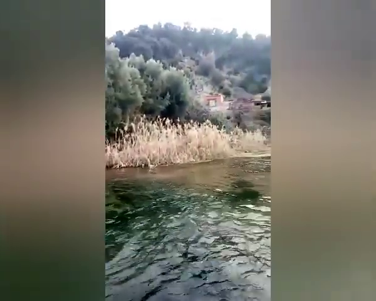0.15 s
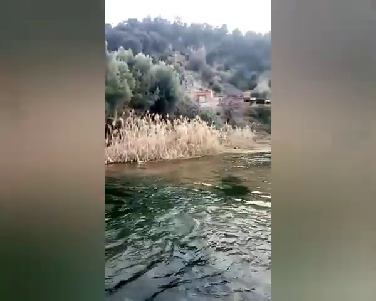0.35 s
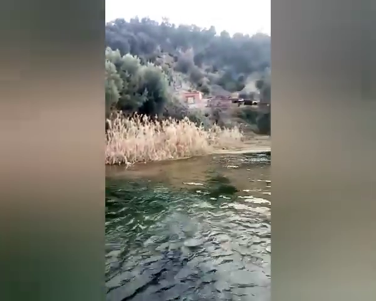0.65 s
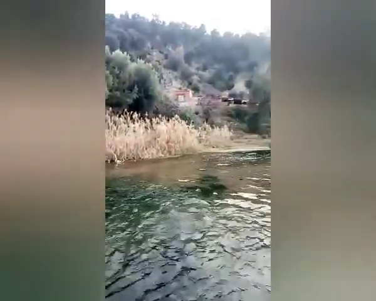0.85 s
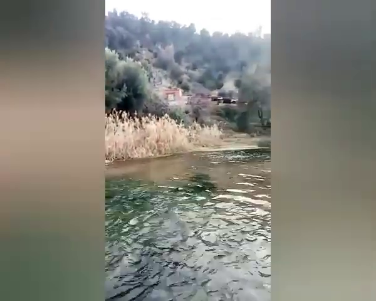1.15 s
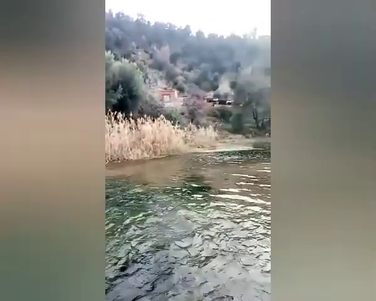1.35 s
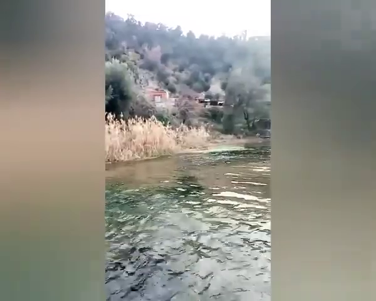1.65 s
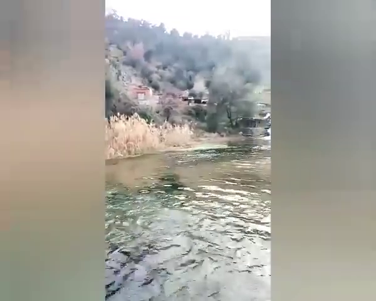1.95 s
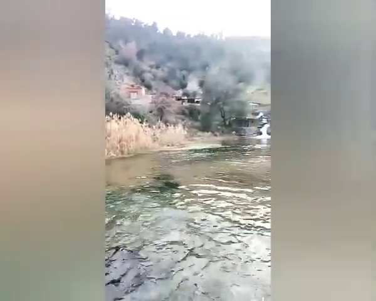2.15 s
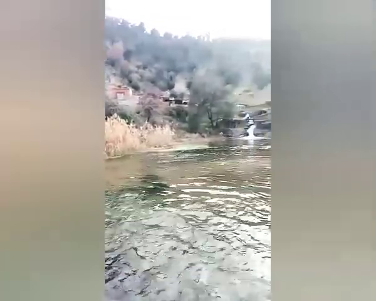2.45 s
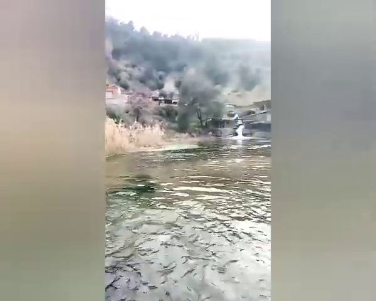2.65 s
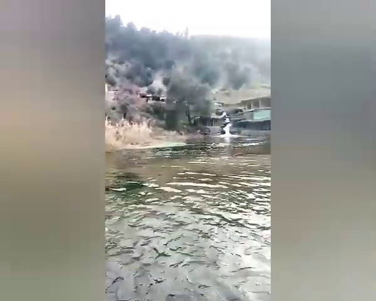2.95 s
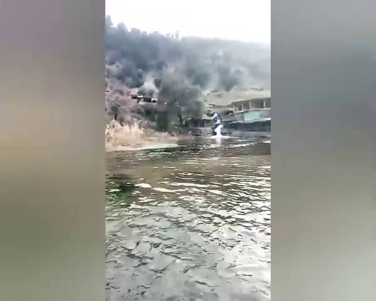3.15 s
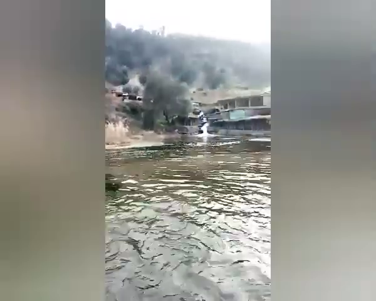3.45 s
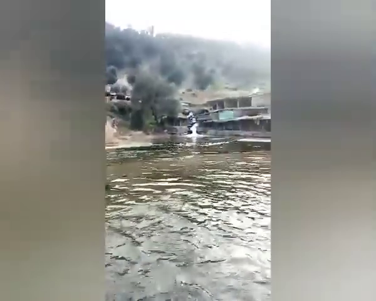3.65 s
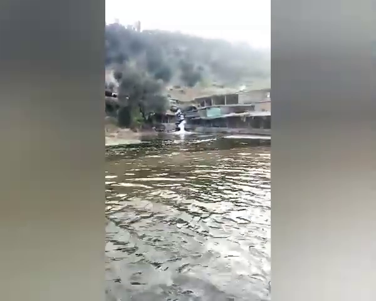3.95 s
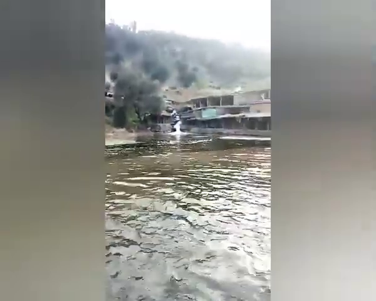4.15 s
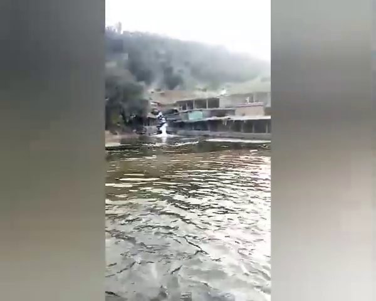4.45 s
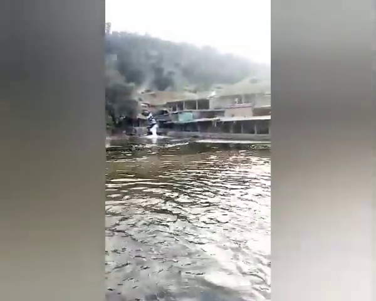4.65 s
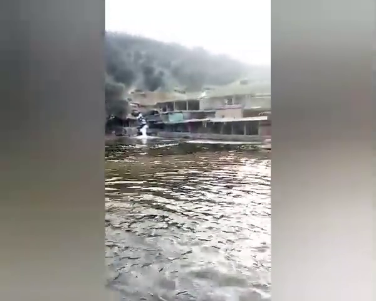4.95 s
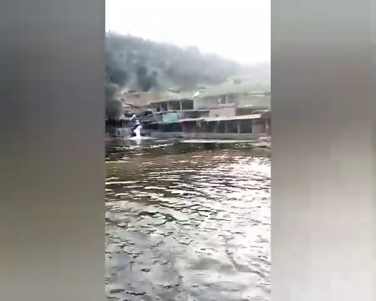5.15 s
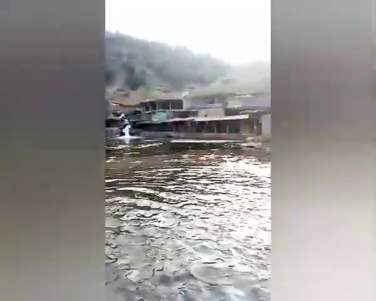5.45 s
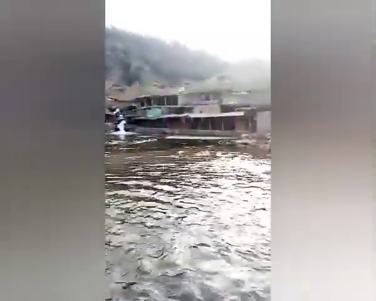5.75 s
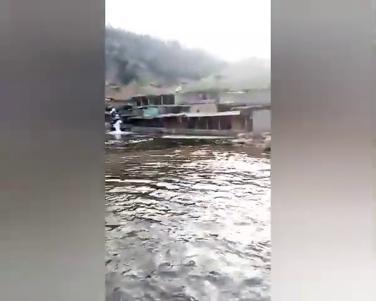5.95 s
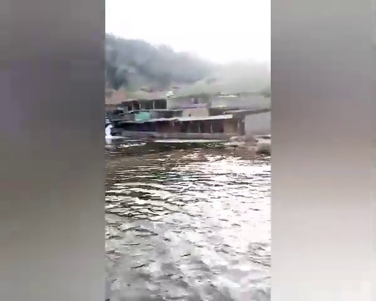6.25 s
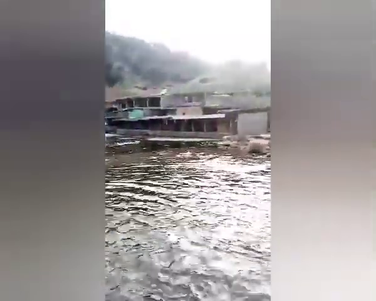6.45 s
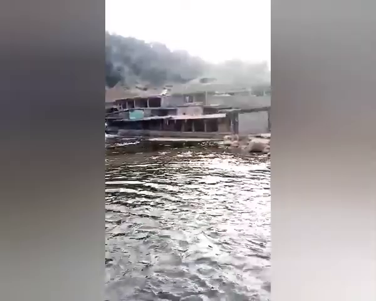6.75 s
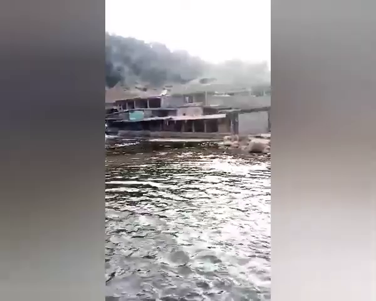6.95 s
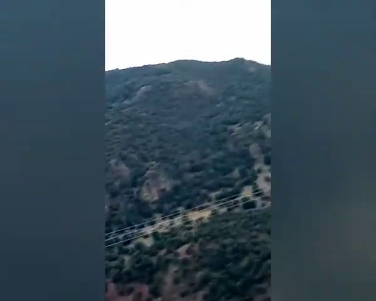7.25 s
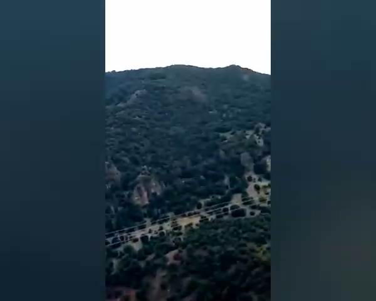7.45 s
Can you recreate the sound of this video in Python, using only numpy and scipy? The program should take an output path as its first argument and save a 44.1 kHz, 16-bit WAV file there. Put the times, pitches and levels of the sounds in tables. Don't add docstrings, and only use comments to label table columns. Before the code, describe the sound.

Steady rushing white water, deep on the left, with fizzing spray and tiny plinks on the right, cut off sharply after a click.

```python
import sys
import numpy as np
from scipy import signal
from scipy.fft import rfft, irfft, next_fast_len
from scipy.io import wavfile
from scipy.ndimage import uniform_filter1d, map_coordinates

SR = 44100
rng = np.random.default_rng(int(sys.argv[2]) if len(sys.argv) > 2 else 0)


def put_to_file(sound):
    columns = np.atleast_2d(sound).T
    safe = np.clip(columns, -1, 1)
    whole_steps = np.round(safe * 32767)
    wavfile.write(sys.argv[1], SR, whole_steps.astype(np.int16))


def invert_db(x):
    u = np.asarray(x, float) / 20
    return 10 ** u


N = 334719
CUT_S = 6.8852


def along(points, hz):
    point_hz, value = np.transpose(points)
    return np.interp(np.log(hz + 1), np.log(point_hz + 1), value)


def unit(x):
    return x / np.sqrt(np.mean(x ** 2))


def filtered(x, response):
    size = next_fast_len(N + 8192)
    spectrum = rfft(x, size) * response(np.fft.rfftfreq(size, 1 / SR))
    return irfft(spectrum, size)[..., :N]


def above(hz, edge_hz):
    return 1 / (1 + (edge_hz / (hz + 1)) ** 4)


def wobble(rate_hz):
    knots = rng.standard_normal((2, 400))
    place = np.arange(N) * rate_hz / SR
    return np.array([map_coordinates(k, [place]) for k in knots])


def rush(patchy_db, tall, long):
    z = signal.stft(rng.standard_normal((2, N)), nperseg=512)[2]
    field = uniform_filter1d(rng.standard_normal(z.shape), tall, 1)
    field = uniform_filter1d(field, long, 2)
    noise = signal.istft(z * invert_db(patchy_db * unit(field)), nperseg=512)[1]
    return unit(noise[:, :N])


def bubbles(start_s, hz, size, cycles, rise):
    t = np.arange(220) / SR
    age = t * hz[:, None] / cycles
    swing = np.sin(2 * np.pi * hz[:, None] * t * (1 + rise * age))
    ring = size[:, None] * swing * age * np.exp(1 - age)
    at = (start_s * SR).astype(int)[:, None] + np.arange(t.size)
    return np.bincount(at.ravel(), ring.ravel(), N + t.size)[:N]


def fizz(count, centre_hz, octaves, spread_db, cycles):
    swarms = []
    for _ in range(2):
        draw = rng.random((count, 2))
        hz = centre_hz * 2 ** (octaves * rng.standard_normal(count))
        hz = np.clip(hz, 400, 15000)
        size = invert_db(-spread_db * np.log(draw[:, 1] + .01)) * np.sqrt(hz / centre_hz)
        swarms.append(unit(bubbles(draw[:, 0] * N / SR, hz, size, cycles, rise=.12)))
    return np.array(swarms)


# (time [s], level [dB])
BREAKING = [(0.0, -33.5), (0.02, -33), (0.3, -33.5), (2.02, -33.5), (2.08, -31.5), (2.23, -34),
            (2.29, -32.5), (2.33, -33.5), (2.48, -31.5), (2.54, -33), (3.83, -33), (3.85, -34.5),
            (4.73, -32), (5.61, -33), (5.65, -32.5), (5.72, -33), (6.83, -32.5), (6.85, -32)]
FOLLOW_SHARES = [.3, .7, 1.1, 1.3]
LAYER_LEVELS = [-0.7, -0.63, .05, 0.48]


def layer_levels():
    t = np.arange(N) / SR
    point_s, level_db = np.transpose(BREAKING)
    swell_db = np.interp(t, point_s, level_db)
    swell_db = swell_db - swell_db[t < CUT_S].mean()
    levels = [db + share * swell_db for db, share in zip(LAYER_LEVELS, FOLLOW_SHARES)]
    levels[3] = levels[3] + 0.24 * (t - CUT_S / 2)
    return levels


# (frequency [Hz], coherence [0-1])
PORT_LIKENESS = [(22, .35), (45, .62), (90, .94), (220, .97), (450, .92), (800, .76), (1300, .65),
                 (1800, .42), (2200, .15), (15000, .15)]


def roar(level_db):
    lead_s = 35.5 / SR
    shared, apart = rush(patchy_db=0.67, tall=8, long=8) * invert_db(level_db + 0.1 * wobble(6)[0])
    sides = np.array([[1], [-1]])

    def mix_angle(hz):
        return np.arccos(np.clip(along(PORT_LIKENESS, hz), 0, 1)) / 2

    def low(hz):
        return np.sqrt(1 - above(hz, 2990)) * np.exp(1j * np.pi * hz * lead_s * sides)

    common = filtered(shared, lambda hz: low(hz) * np.cos(mix_angle(hz)))
    return common + filtered(apart, lambda hz: low(hz) * np.sin(mix_angle(hz)) * sides)


def hiss(left_db, right_db, surge_db):
    froth = fizz(count=9000, centre_hz=5070, octaves=0.675, spread_db=1, cycles=1.5)
    froth = froth * invert_db([[-13], [-9]])
    level_db = np.array([left_db, right_db]) + surge_db - 0.14
    foam = (rush(patchy_db=0.7, tall=20, long=6) + froth) * invert_db(level_db)
    return filtered(foam, lambda hz: np.sqrt(above(hz, 2350) * (1 - above(hz, 9000))))


def spray(level_db, surge_db):
    gusts_db = .5 * surge_db + .5 * wobble(14)[0]
    mist = rush(patchy_db=3.5, tall=10, long=5) * invert_db(level_db + gusts_db)
    return filtered(mist, lambda hz: np.sqrt(above(hz, 9000)))


def water():
    roar_db, left_db, right_db, spray_db = layer_levels()
    surge_db = wobble(7.2) * [[.4], [.6]] + wobble(30) * [[.3], [.5]]
    return roar(roar_db) + hiss(left_db, right_db, surge_db) + spray(spray_db, surge_db)


# (frequency [Hz], level on white noise [dB])
LEFT_COLOUR = [(25, -33), (45, -24.5), (85, -8), (170, -4.5), (400, -3.5), (900, -7), (1400, -10),
               (1650, -12), (2400, -15), (5000, -20.5), (6000, -20), (6650, -17.5), (6800, -18),
               (7400, -20.5), (8200, -32), (10000, -43), (13400, -58), (13850, -62)]
# (frequency [Hz], level on white noise [dB])
RIGHT_COLOUR = [(25, -38.5), (45, -25), (85, -14), (200, -9.5), (450, -13), (900, -16.5), (1500, -18.5),
                (2200, -23.5), (2900, -23), (3550, -30), (4100, -31), (6600, -20), (7500, -26),
                (9000, -39.5), (12000, -50.5), (13850, -51)]
# (frequency [Hz], left level [dB], right level [dB])
SLIT_RESONANCE = [(13950, -60, -50), (14250, -53.5, -47), (14600, -50, -43), (15500, -52, -44)]


def ports(x):
    left = LEFT_COLOUR + [(hz, db) for hz, db, _ in SLIT_RESONANCE]
    right = RIGHT_COLOUR + [(hz, db) for hz, _, db in SLIT_RESONANCE]
    return filtered(x, lambda hz: invert_db([along(left, hz), along(right, hz)]))


# (time [s], peak level [dB], pitch [Hz])
NEAR_DROPS = [(0.408, -29, 6590), (0.938, -23, 6000), (0.993, -24, 5500), (1.582, -28, 6030),
              (1.678, -22.5, 2490), (2.077, -26, 2460), (2.27, -21.5, 6980), (2.283, -17.5, 6780),
              (2.3, -24.5, 6330), (2.429, -18, 6460), (2.469, -17, 5300), (2.489, -17.5, 6570),
              (2.496, -22.5, 7250), (2.86, -27.5, 2560), (3.315, -18, 2110), (4.219, -26, 2870),
              (4.526, -38, 5880), (4.981, -22.5, 6270), (5.003, -27.5, 1770), (5.762, -17, 1620),
              (5.94, -23.5, 6500), (6.292, -19.5, 6370), (6.417, -21.5, 6220), (6.667, -21.5, 6610),
              (6.78, -25, 1736)]


def drops():
    peak_s, peak_db, hz = np.transpose(NEAR_DROPS)
    cycles = hz[:, None] * .0006
    plink = bubbles(peak_s - .0008, hz, invert_db(peak_db + 1.5), cycles, rise=.01)
    return plink * invert_db([[-8], [0]])


def scene():
    return ports(water()) + drops()


def roll_off(x):
    return signal.sosfilt(signal.butter(12, 15520, fs=SR, output="sos"), x)


def record(dry):
    t = np.arange(N) / SR
    jump_s = 6.8691
    jump = invert_db(-13.5) * np.exp(-np.clip(t - jump_s, 0, 1) / .0002) * (t > jump_s)
    tail_gain = invert_db(-23 - 2200 * np.clip(t - CUT_S, 0, 1)) * (t < CUT_S + .032)
    mix = (dry + jump) * np.where(t < CUT_S, 1, tail_gain)
    return roll_off(mix)


dry = scene()
out = record(dry)
put_to_file(out)
```